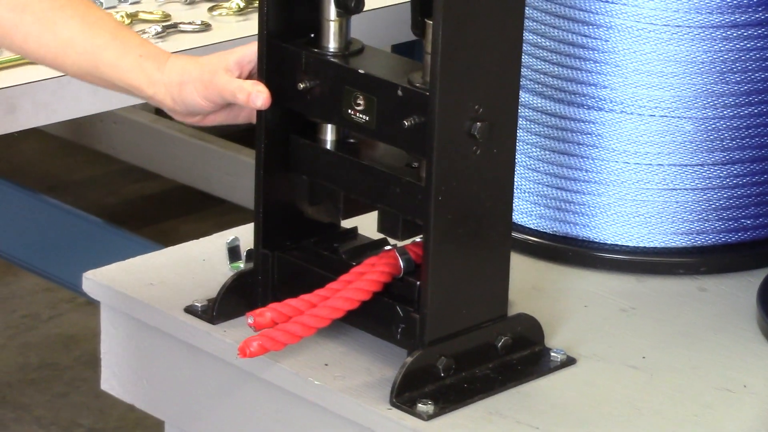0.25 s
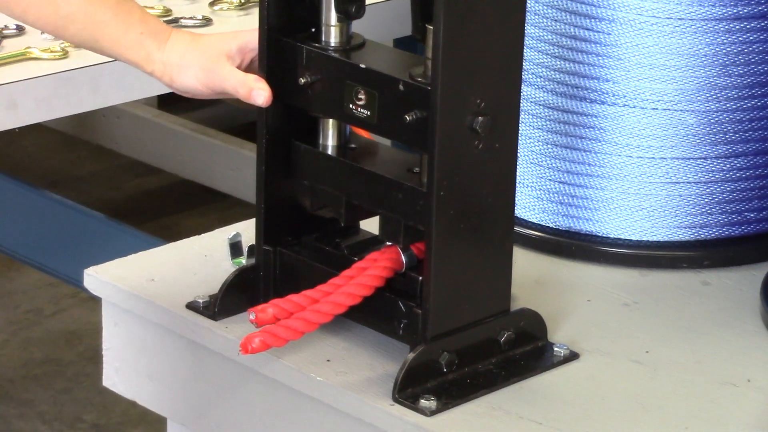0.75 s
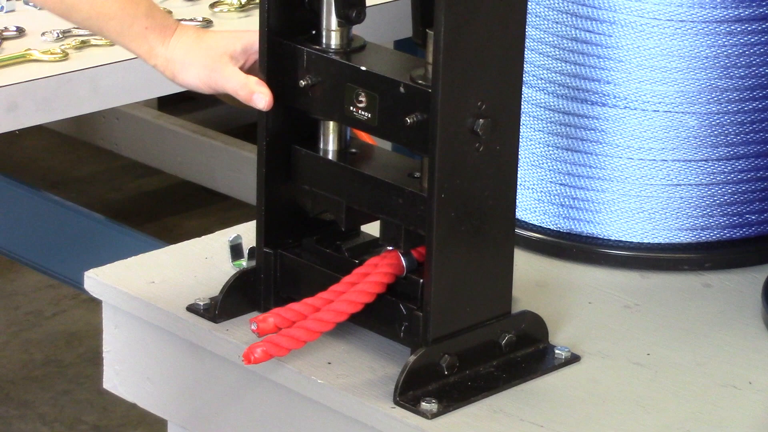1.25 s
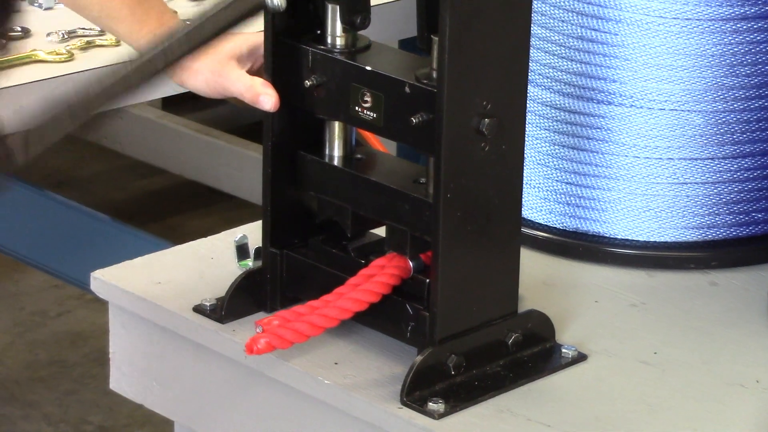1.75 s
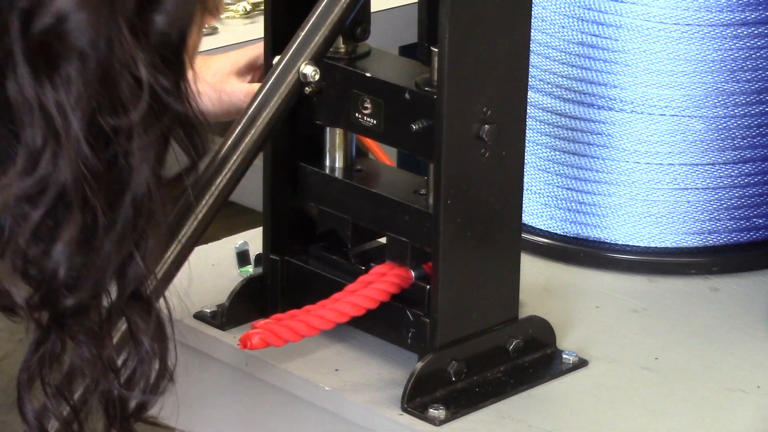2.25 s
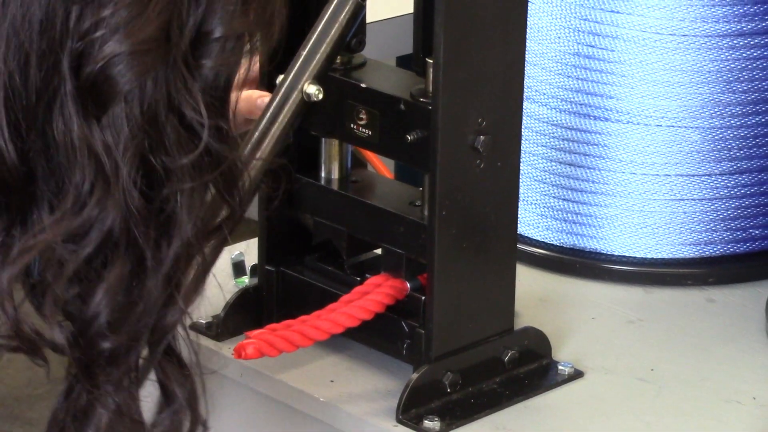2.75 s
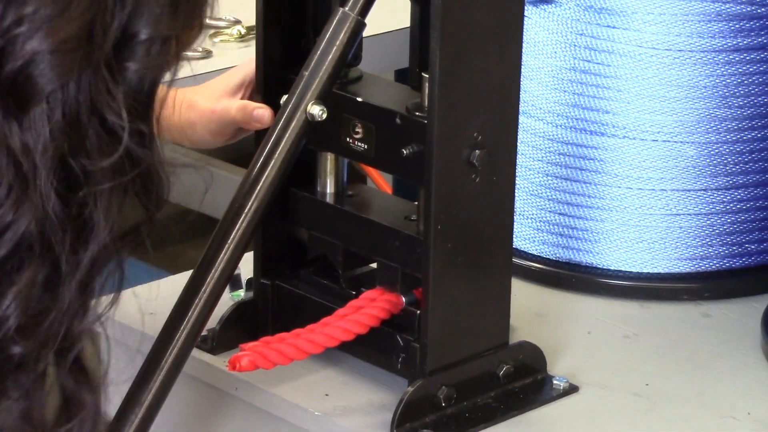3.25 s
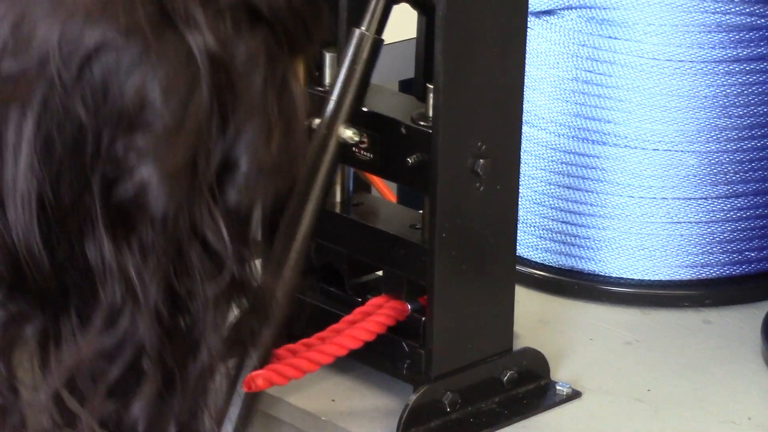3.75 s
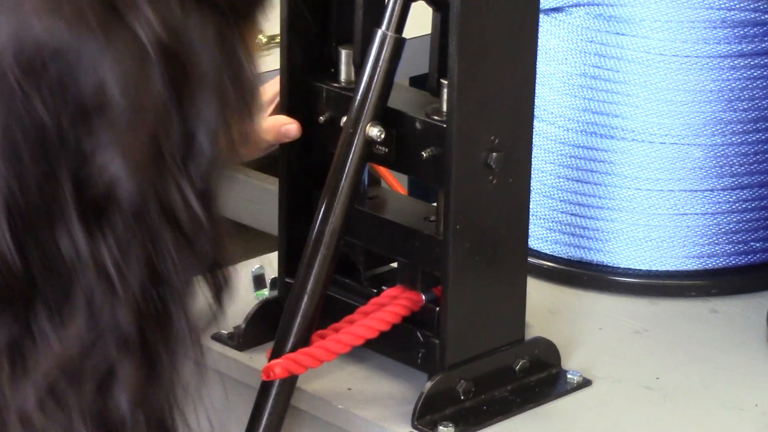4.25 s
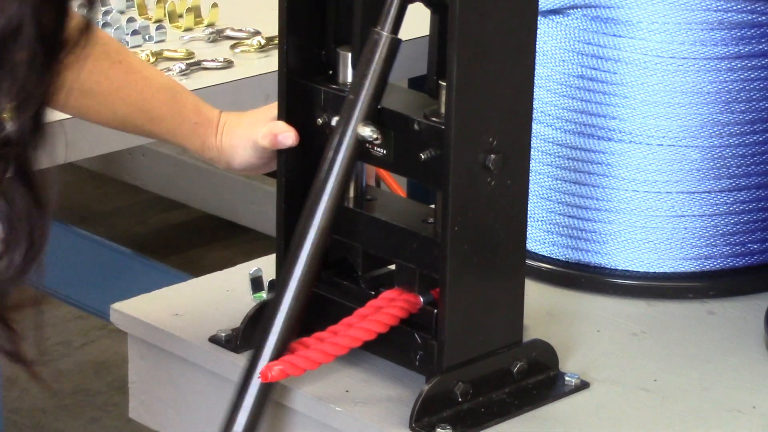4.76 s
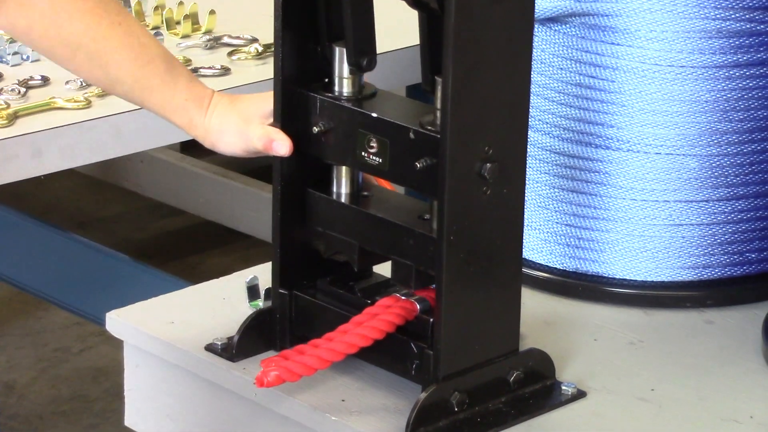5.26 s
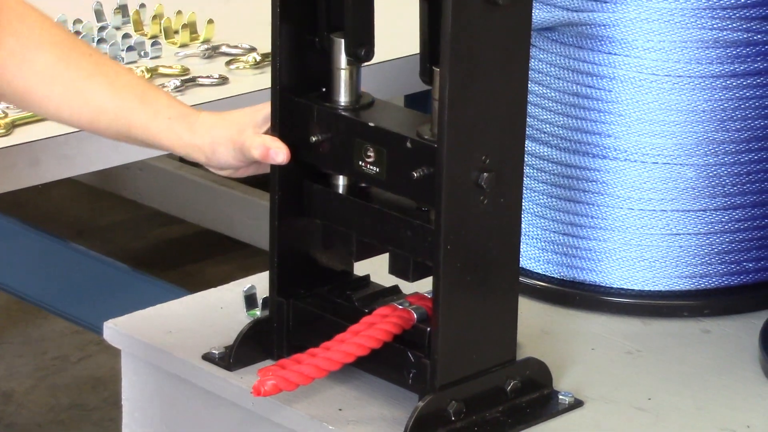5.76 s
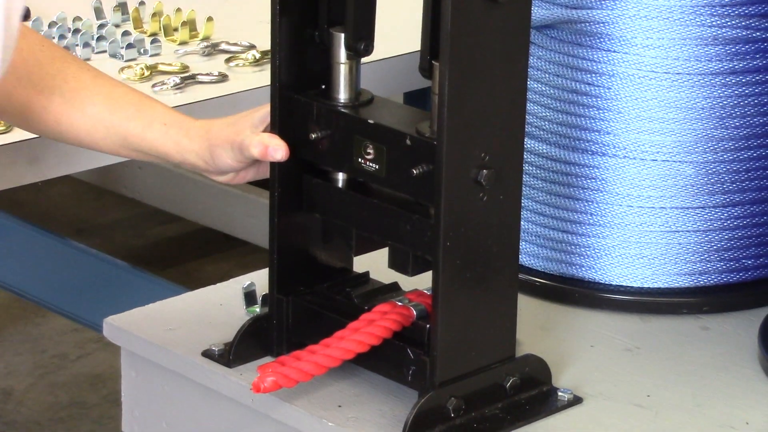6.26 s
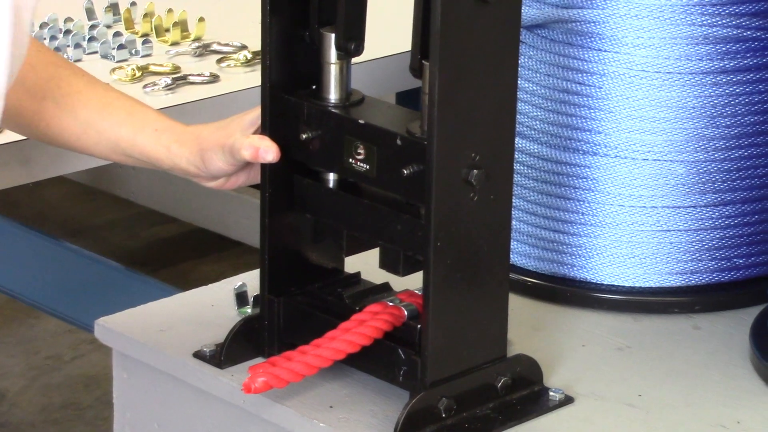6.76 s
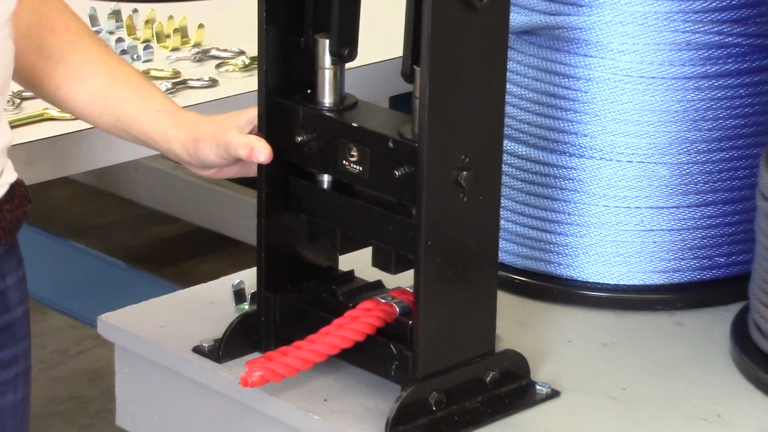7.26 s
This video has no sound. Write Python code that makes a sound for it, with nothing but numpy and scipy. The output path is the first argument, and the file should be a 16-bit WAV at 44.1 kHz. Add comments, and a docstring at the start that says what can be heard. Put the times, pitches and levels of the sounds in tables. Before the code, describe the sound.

A steel hand press clicks shut, then three heavy ringing clanks as its lever is hauled, with dull knocks and lighter clacks, in a humming workshop.

```python
"""Hand-lever press in a workshop

A hand-lever bench press crimps a metal clamp on a rope, close to two microphones.
The die closes, the lever is hauled down in three heavy clanks, a pin pings, the ram and linkage clack.
Contacts excite noise bands and decaying modes of frame and parts; hands and sleeves add shaped noise.
A diffuse room tail and one far wall answer, over air noise and hum; peaks beyond full scale clip."""
import sys
import numpy as np
from scipy import signal
from scipy.fft import rfft, irfft, next_fast_len
from scipy.io import wavfile
from scipy.ndimage import uniform_filter1d

SR = 44100
rng = np.random.default_rng(int(sys.argv[2]) if len(sys.argv) > 2 else 0)


def to_wav(sig):
    """Store sig (one row per channel, or 1-D mono) as 16-bit WAV at the path in sys.argv[1].

    Samples outside -1..1 are clipped; the rate is SR.
    """
    pcm = np.clip(np.atleast_2d(sig), -1, 1) * 32767
    pcm = np.round(pcm).astype(np.int16)
    wavfile.write(sys.argv[1], SR, pcm.T)  # frames by channels


N = 331100
T = np.arange(N) / SR  # s
RING_S = 0.6  # longest ring or room tail
AGE = T[:int(RING_S * SR)]  # s since a sound began


def undb(db):
    """Amplitude ratio of a level: 20 dB per factor of ten."""
    return 10 ** (np.asarray(db) / 20)


def unit(x):
    """Normalization by the root mean square, to rms 1."""
    return x / np.sqrt(np.mean(x ** 2))


def at(hz, points):
    """Linear interpolation of (f/Hz, value) points on a log-frequency axis."""
    f, value = np.transpose(points)
    return np.interp(np.log(np.maximum(hz, 1)), np.log(f), value)


def fade(t60):
    """Exponential decay of a damped vibration, 60 dB down after t60 seconds."""
    return np.exp(-np.log(1000) * AGE / t60)


def add(track, s, sound):
    """Superposition of a sound on a track from time s."""
    i = int(s * SR)
    track[i:i + len(sound)] += sound[:N - i]


def noise(points):
    """Spectral shaping of white noise by (f/Hz, level/dB) points, to rms 1."""
    size = next_fast_len(N, True)
    hz = np.arange(size // 2 + 1) * SR / size
    spectrum = rfft(rng.standard_normal(size)) * undb(at(hz, points))
    return unit(irfft(spectrum, size)[:N])


def bands(size):
    """Subdivision of noise into overlapping bands half an octave apart, as (centre Hz, samples)."""
    centres = 62.5 * 2 ** np.arange(0, 8.1, 0.5)
    octave = np.log2(np.maximum(np.arange(size // 2 + 1) * SR / size, 1))
    out = []
    for hz in centres:
        # cosine weight, zero half an octave to either side
        slope = np.cos(np.pi * np.clip(octave - np.log2(hz), -0.5, 0.5))
        band = irfft(rfft(rng.standard_normal(size)) * slope, size)
        out.append((hz, unit(band)))
    return out


def walk(rate):
    """Slow random fluctuation of rms 1: steps drawn at about `rate` per second, smoothed twice."""
    k = int(SR / rate)
    steps = rng.standard_normal(1024)[np.arange(N) // k]
    return unit(uniform_filter1d(uniform_filter1d(steps, k), k))


def mode(hz, t60, build_cycles):
    """Damped resonance that takes some cycles to spread through the metal, then dies away."""
    build_up = 1 - np.exp(-AGE * hz / build_cycles)
    return np.sin(2 * np.pi * hz * AGE) * fade(t60) * build_up


def ventilation(air_db=-42, rumble_db=-51.5, side_db=-58):
    """Broadband flow noise with a fan hum and a few drifting duct tones."""
    # spectrum of the air rush: f/Hz, relative level/dB
    air_spectrum = [(100, -17.5), (150, -8), (220, -4), (340, -9.5), (410, -11), (550, -15), (700, -14.5),
                    (1000, -20.5), (2000, -28), (4000, -36), (8000, -42), (12000, -45.5), (15500, -52)]
    # fan hum, then duct tones: f/Hz, nominal rms level/dB
    fan_lines = [(74.6, -45.5), (49.5, -62.5), (116.8, -58), (161, -52.5), (197.6, -56.5), (225, -55)]
    high_pass = signal.butter(4, 120, "high", fs=SR, output="sos")
    rush = unit(signal.sosfilt(high_pass, noise(air_spectrum)))
    rush = rush * undb(air_db + 0.49 * walk(3.897))
    rumble = undb(rumble_db) * noise([(20, -33), (40, -21), (60, -2), (110, -5), (200, -35), (1000, -68)])

    (hum_hz, hum_db), *ducts = fan_lines
    hum_phase = 2 * np.pi * hum_hz * T + 0.36 * walk(3.1)
    tones = undb(hum_db) * (1 + 0.15 * walk(6.9)) * np.sin(hum_phase)
    for hz, db in ducts:
        phase = 2 * np.pi * hz * T + 0.65 * walk(5)
        tones += undb(db) * (1 + 0.45 * walk(8.2)) * np.sin(phase)
    # noise of opposite sign in the two channels widens the air
    side = undb(side_db) * noise([
        (30, 9), (120, 1.0), (300, 12), (1000, 3.5), (2300, -4.0), (4500, -10), (8000, -19.5), (15000, -31)])
    # sqrt(2) turns rms into peak amplitude
    return rush + rumble + np.sqrt(2) * tones + side * np.array([[1], [-1]])


def room(x, wet_db=-18.5, wall_s=0.078, wall_db=-19):
    """Reverberation by convolution with a diffuse tail, plus one low-passed echo from a far wall."""
    ring_times = [(250, 0.46), (1500, 0.35), (11000, 0.27)]  # f/Hz, t60/s
    # sqrt(hz) gives equal energy per Hz in the bands
    tail = sum(np.sqrt(hz) * band * fade(at(hz, ring_times)) for hz, band in bands(len(AGE)))
    tail = tail * (1 - np.exp(-(AGE / 0.021) ** 2))  # builds up over the first reflections
    wet = signal.fftconvolve(x, undb(wet_db) * tail / np.linalg.norm(tail))[:N]
    low_pass = signal.butter(2, 1500, fs=SR, output="sos")
    add(wet, wall_s, undb(wall_db) * signal.sosfilt(low_pass, x))
    return wet


def capsules(x, scatter_t60=0.12, pan_db=-0.45):
    """Decorrelation: nearby reflections reach two close capsules differently, with a frequency-set width."""
    scatter = rng.standard_normal(len(AGE)) * fade(scatter_t60)
    scatter = scatter / np.linalg.norm(scatter)
    # f/Hz, level/dB of the part added to one capsule and subtracted from the other
    width_db = [(250, -43.5), (700, -27.5), (2000, -21.5), (5000, -20.5), (12000, -26)]
    width = undb(at(np.fft.rfftfreq(len(AGE), 1 / SR), width_db))
    side = signal.fftconvolve(x, irfft(rfft(scatter) * width))[:N]
    # pan_db is the first channel's gain relative to the second
    return np.array([x + side, x - side]) * undb(np.array([[pan_db], [-pan_db]]) / 2)


def rubs(grain_db=2.5):
    """Friction noise: soft, uneven swishes of skin and cloth under Gaussian envelopes."""
    # hands and sleeves sliding on the lever: t/s, Gaussian spread/s, level/dB before grain
    slides = [(1.157, 0.046, -62), (1.617, .03, -58), (1.88, 0.2, -60), (2.06, 0.022, -57),
              (2.867, 0.026, -53.5), (4.3, 0.067, -56.5), (4.465, 0.076, -59), (5.553, .06, -58.5)]
    envelope = sum(undb(db) * np.exp(-((T - s) / spread) ** 2 / 2) for s, spread, db in slides)
    grain = undb(grain_db * walk(110))
    hiss = noise([(300, -17), (2000, 13.5), (4500, 1.5), (6800, 5), (8500, -6.0), (12000, -4), (16000, -18)])
    return envelope * grain * hiss


def parts():
    """Modal superposition: single parts each add their own damped ring when struck."""
    # modes of the die: f/Hz, level/dB, t60/s
    DIE = [(357.6, -13, 0.14), (773, -14.5, 0.12), (891, -19.5, 0.19), (949, -21, 0.14),
           (2100, -18.5, 0.049), (2380, -24, 0.11), (2595, -22.5, 0.089), (2684, -16.5, 0.055),
           (2754, -22, 0.12)]
    # modes of the jaws: f/Hz, level/dB, t60/s
    JAWS = [(411, -10.5, 0.27), (788, -5.5, 0.14), (1010, -37, 0.13), (1966, -14, 0.17), (2024, -19, 0.12),
            (2670, -20.5, 0.098), (2820, -31, 0.14)]
    # modes of the bench: f/Hz, level/dB, t60/s
    BENCH = [(305.5, -24, 0.48), (342, -33, .3)]
    # modes of the lever stop: f/Hz, level/dB, t60/s
    LEVER_STOP = [(266.8, -0.5, 0.23), (726, -5, 0.15), (737, -6, 0.14), (1260, -15, 0.17),
                  (1294, 1.5, 0.047), (1360, -5.5, 0.081), (1390, -14, 0.07), (1403, -4, 0.051),
                  (1410, -33, 0.2), (1550, -18.5, 0.17), (1727, -6.5, 0.034), (1835, -11, 0.088),
                  (1986, -19, 0.12)]
    # modes of the pin: f/Hz, level/dB, t60/s
    PIN = [(9954, -45, .09), (10630, -35, .22), (10760, -33, .04), (14060, -45, .09)]
    # modes of the ram: f/Hz, level/dB, t60/s
    RAM = [(850, -23.5, 0.074), (1860, -29, 0.1), (1994, -18.5, 0.039), (2220, -21.5, 0.049),
           (2720, -14.5, 0.019), (3440, -13, 0.021), (3500, -35, 0.05), (4500, -31, 0.047)]
    # modes of the link: f/Hz, level/dB, t60/s
    LINK = [(1000, -18, 0.088), (1836, -21, 0.054), (2600, -14, 0.04), (3210, -15, 0.023),
            (3500, -31, 0.089), (4550, -30.5, 0.054), (5580, -20.5, 0.035), (6370, -31, 0.079),
            (6800, -35, .09), (11900, -46, 0.14), (12520, -38, 0.065)]
    # when each part is struck: t/s, its modes
    strikes = [(.923, DIE), (2.481, JAWS), (3.827, LEVER_STOP), (4.669, JAWS), (4.922, PIN), (5.306, RAM),
               (5.425, BENCH), (6.360, LINK)]
    out = np.zeros(N)
    for s, modes in strikes:
        ring = sum(undb(db) * mode(hz, t60, build_cycles=4.4) for hz, db, t60 in modes)
        add(out, s, ring)
    return out


def contacts(pivot_hz=844):
    """Contact spectra as (s, contact ms, spectrum): a colour tilted about a pivot by weight and hardness."""
    # Weight sets the slope below the pivot, hardness above it; positive values lift the extremes.
    # heavy clanks as the lever is hauled, two of them with a rebound:
    # t/s, level/dB before colour, contact/ms, weight/(dB/octave), hardness/(dB/octave)
    clanks = [ (2.4785, -7, 1.4, -4.5, 0.25), (2.4895, -21, 2.9, -2, .2), (3.826, -12.5, 3.7, -6.5, -2),
              (4.6669, -8, 1.4, -5.5, -0.1), (4.685, -18.5, 2.4, 5, -10)]
    # colour of the clanks: f/Hz, level/dB
    clank_colour = [(250, -4), (430, -4), (800, -1.5), (1300, -3), (2300, -5), (5500, -21), (11000, -38.5)]
    # dull knocks as the press shifts on the bench:
    # t/s, level/dB before colour, contact/ms, weight/(dB/octave), hardness/(dB/octave)
    knocks = [ (.888, -37, .4, 1, -3), (3.422, -19.6, 4.7, -7, -4.5), (4.181, -29.7, 7, -5, -2),
              (4.223, -31, 5.6, -2.5, 1), (4.250, -37.1, 8.5, 0.7, 1.8), (4.295, -40.5, 6, -3.5, 0.5),
              (5.034, -40, .6, -4, 0), (5.420, -37, 4.5, 0, -0.2), (5.456, -46, 15, 6, -5),
              (5.561, -41.5, 7.2, -1, -15), (6.324, -35, .9, -7, 0), (6.380, -40, 5.6, 6.5, 6)]
    # colour of the knocks: f/Hz, level/dB
    knock_colour = [(250, 6), (430, 4.5), (800, -1.5), (1300, -4), (2300, -18), (5500, -21), (11000, -37)]
    # sharp steel clicks of die, lever stop, pin, ram and linkage:
    # t/s, level/dB before colour, contact/ms, weight/(dB/octave), hardness/(dB/octave)
    clicks = [ (.851, -46, 7, 7, 1.1), (.9178, -28.5, .3, -16, 0.1), (.923, -26, 1.3, 0.9, -2),
              (3.827, -31.5, 5, -0.5, 3.5), (4.232, -41.5, .8, -3, .5), (4.868, -47.5, 2.5, -6, 5.6),
              (4.909, -35, 3.5, -4, -2.5), (4.922, -27.5, 2, 0, 0), (4.945, -30.5, 3.9, 3, -2.5),
              (5.306, -30.5, 0.47, -1.5, -2), (5.800, -60, 4, 11, 4.5), (6.338, -49, .85, 10.5, 1.5),
              (6.359, -25.5, 3.9, -3.6, -2.5), (6.415, -38, 1.4, -3.5, 0.5), (6.426, -50, 1.8, 7, 0.5),
              (7.407, -53, 1.6, -9, 3.5)]
    # colour of the clicks: f/Hz, level/dB
    click_colour = [(250, 1.5), (430, -2), (800, -1), (1300, -2.5), (2300, -3), (5500, -8), (11000, -18.5)]
    for rows, colour in (clanks, clank_colour), (knocks, knock_colour), (clicks, click_colour):
        hz, colour_db = np.transpose(colour)
        octaves = np.log2(hz / pivot_hz)
        for s, db, contact_ms, weight, hardness in rows:
            tilt_db = np.where(octaves < 0, weight, hardness) * np.abs(octaves)
            yield s, contact_ms, list(zip(hz, db + colour_db + tilt_db))


def blows(spread_cycles=0.91, dense_db=-18.5, crack=5.5, crack_t60=0.051):
    """Impact excitation: each contact drives a dense clatter of plate modes and the frame's clear ones."""
    # how readily frame and bench radiate: f/Hz, level/dB
    radiation = [(40, -39), (110, -22.5), (160, -7.5), (260, -4.5), (340, 1), (430, 1), (560, -0.5),
                 (800, 1), (1100, -3.5), (1500, -3), (2000, 0), (3100, 3), (4300, -3), (6500, -1),
                 (10000, -2.5), (16000, -5)]
    # modes of the steel frame on its bench: f/Hz, relative level/dB, t60/s
    frame_modes = [(167, -7, 0.3), (273.7, 2.5, 0.24), (317.5, -4.5, 0.29), (392, -2.5, 0.31),
                   (427.3, -6, 0.16), (540, -49, 0.079), (567.4, -9.5, 0.32), (664, -9.5, 0.22),
                   (737.3, -12.5, 0.45), (779.4, 1, 0.099), (800.5, 1, 0.13), (886, -11, 0.3),
                   (1042, -7, 0.2), (983, -14, 0.24), (1095, -4, 0.1), (1277, -3, 0.11),
                   (1865, -0.5, 0.071), (1913, -5, 0.13), (1970, -13.5, 0.093), (2710, -23, 0.047),
                   (2710, -8, 0.14), (3030, -32, 0.11), (3160, -24, 0.11)]
    ring_times = [(250, 0.25), (900, 0.15), (3000, 0.16), (11000, 0.25)]  # f/Hz, t60/s
    clatter = []
    for hz, band in bands(2 * len(AGE)):
        # the treble cracks hardest while the surfaces still touch
        decay = fade(at(hz, ring_times)) + crack * hz / 8000 * fade(crack_t60)
        clatter.append((hz, band, decay))
    rings = [(hz, undb(db) * mode(hz, t60, build_cycles=1.0)) for hz, db, t60 in frame_modes]

    out = np.zeros(N)
    for s, contact_ms, colour in contacts():
        start = rng.integers(len(AGE))  # a random stretch of the noise for each blow
        hit = sum(undb(at(hz, colour)) * ring for hz, ring in rings)
        for hz, band, decay in clatter:
            # a long contact swells slowly, and the lows come late
            swell_s = contact_ms / 1000 + spread_cycles / hz
            swell = 1 - np.exp(-(AGE / swell_s) ** 2)
            burst = unit(band[start:start + len(AGE)] * swell * decay)
            hit = hit + burst * undb(at(hz, colour) + at(hz, radiation) + dense_db)
        add(out, s, hit)
    return out


def scene():
    """Superposition of direct sound, room response and ventilation; the press is almost straight ahead."""
    press = blows() + parts() + rubs()
    return capsules(press + room(press)) + ventilation()


def record(dry):
    """Overload and band limiting: peaks beyond full scale clip, then a steep low-pass cuts the top."""
    clipped = np.clip(dry, -1, 1)
    low_pass = signal.ellip(8, 0.2, 70, 15550, fs=SR, output="sos")  # ripple dB, stopband dB, edge Hz
    return signal.sosfilt(low_pass, clipped)


dry = scene()
out = record(dry)
to_wav(out)
```